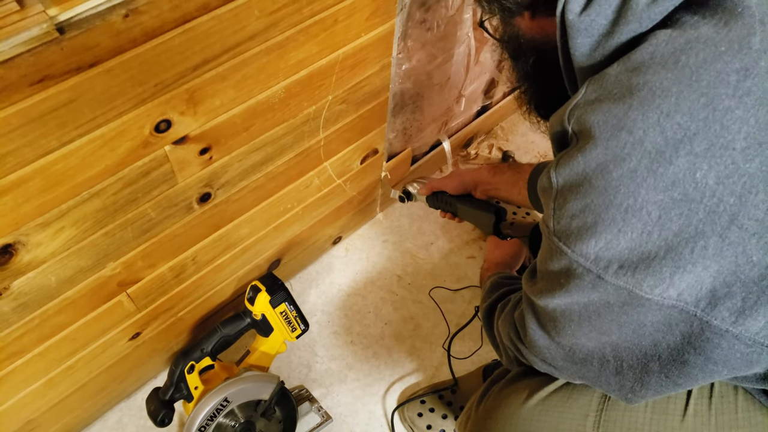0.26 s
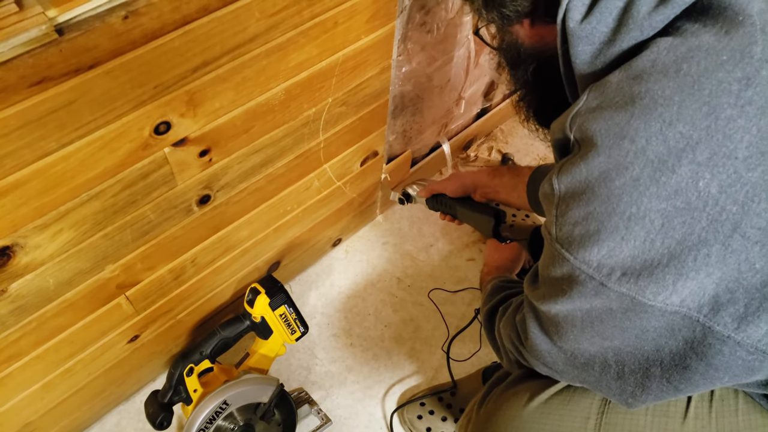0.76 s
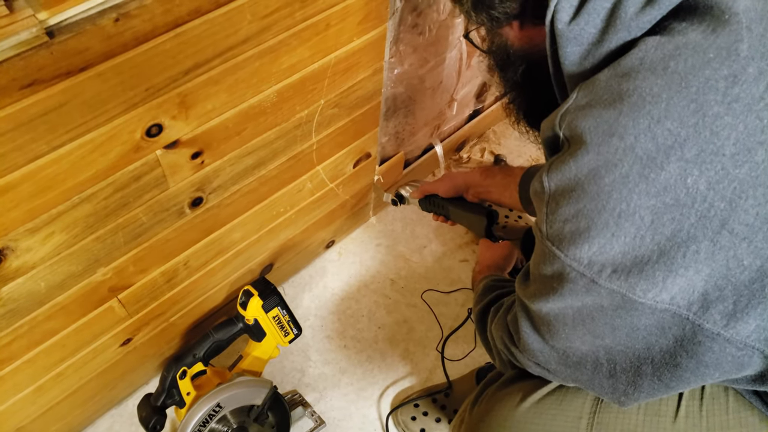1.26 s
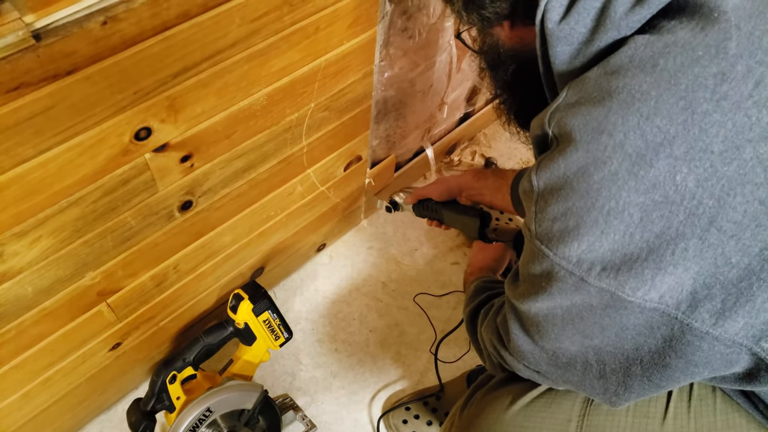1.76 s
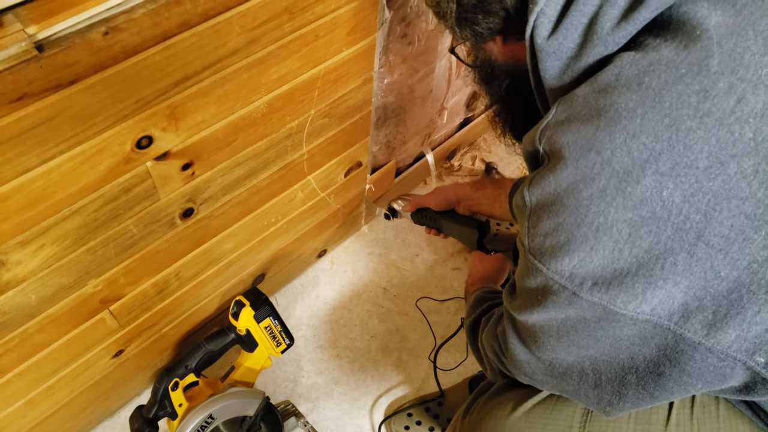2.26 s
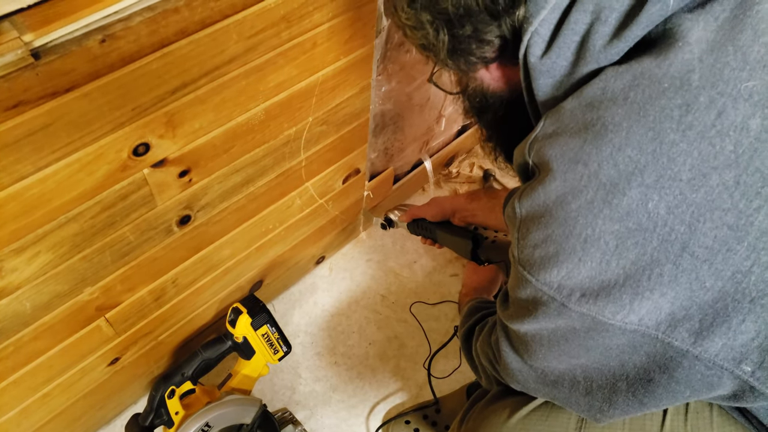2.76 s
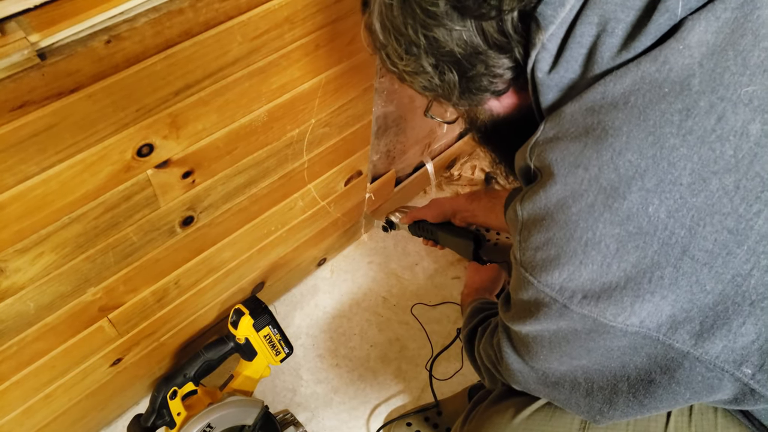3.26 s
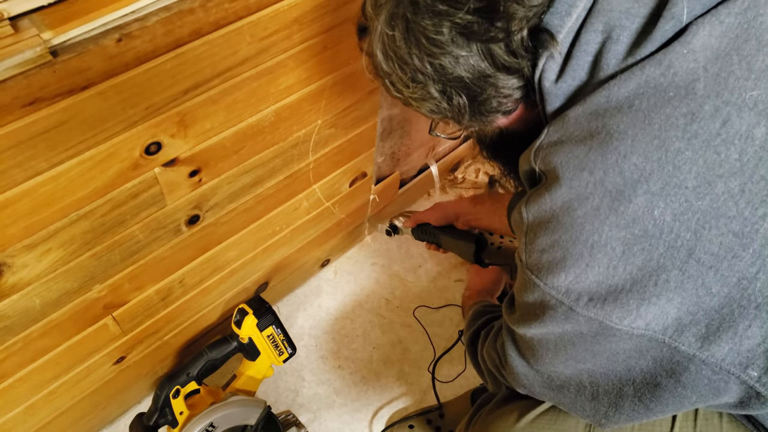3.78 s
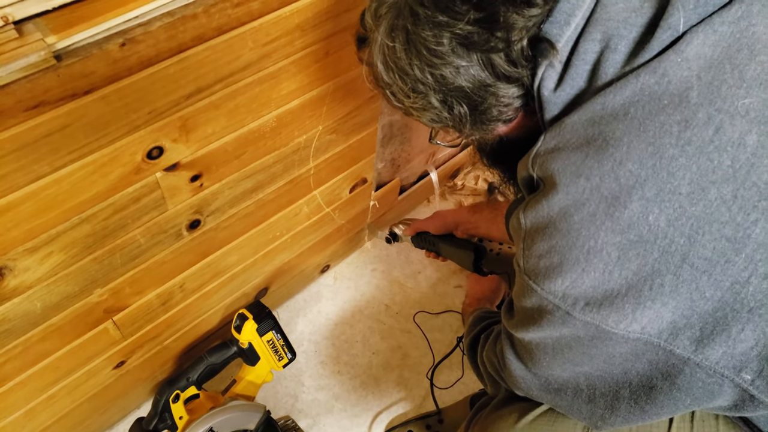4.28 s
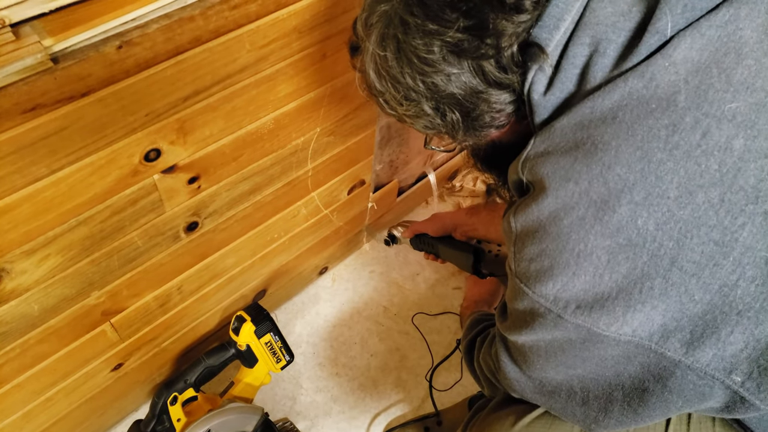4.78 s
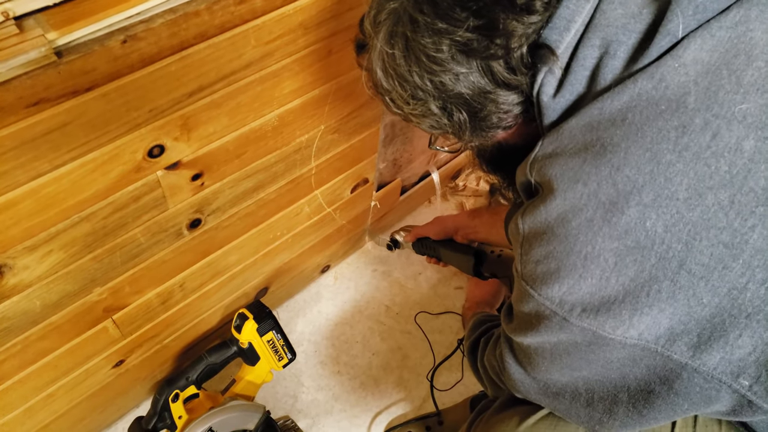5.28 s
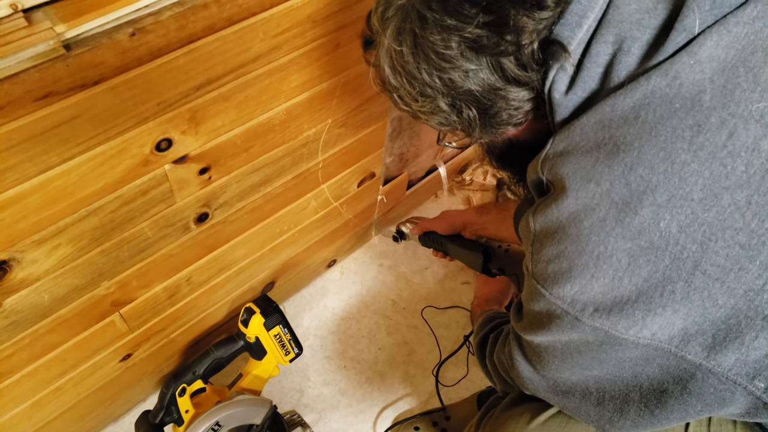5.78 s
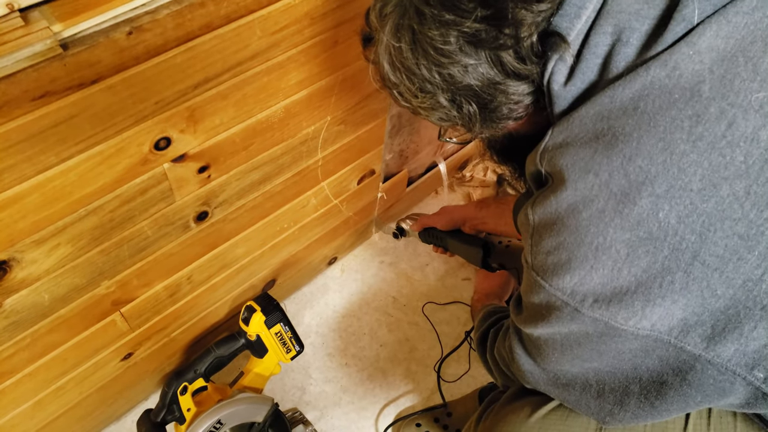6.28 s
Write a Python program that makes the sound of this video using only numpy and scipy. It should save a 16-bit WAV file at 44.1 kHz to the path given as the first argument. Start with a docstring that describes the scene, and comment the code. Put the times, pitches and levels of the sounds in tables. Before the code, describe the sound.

An oscillating multi-tool cuts a wooden wall, close on the left in a small room with a short echo. At the start its buzz is winding down, leaving a faint high whine. At 0.4 seconds it restarts with a soft knock and bites into the wood, rasping and sizzling over the hum of the shaking boards. From about 1.5 seconds it coasts down, stopping at 2 seconds, where the thin whine returns. A few small clicks come at 2.4 seconds as the motor starts again, then it cuts until the end, around 6.6 seconds. The pitch sags and the blade chatters near 3, 4 and 5.5 seconds, and most deeply at 6 seconds, recovering each time. The steel sizzles brightest between 4.3 and 5 seconds, and brief splintery crunches mark hard spots, most clearly near 0.6, 3.9 and 5.1 seconds.

```python
"""An oscillating multi-tool cuts into a wooden wall, close by on the left in a small room. Every stroke of the
blade rasps the wood and shakes the wall. Under load the motor sags and the blade chatters (catches unevenly);
it sizzles in its slot and crunches on hard spots. Twice the motor stands still and its speed controller whines;
the trigger clicks and the tool knocks as it starts again."""
import sys
import numpy as np
from scipy import signal
from scipy.fft import rfft, irfft, next_fast_len
from scipy.io import wavfile
from scipy.ndimage import uniform_filter1d, map_coordinates

SR = 44100
rng = np.random.default_rng(int(sys.argv[2]) if len(sys.argv) > 2 else 0)


def persist_wave(psi):
    """Save psi, clipped to +-1, as 16-bit WAV."""
    counts = np.round(np.clip(psi, -1, 1) * 32767).astype(np.int16)
    wavfile.write(sys.argv[1], SR, np.atleast_2d(counts).T)


N = 288414
TIME = np.arange(N) / SR

# tone colour of the steel blade: (frequency [Hz], relative level [dB])
BLADE_COLOUR = [(7500, -22), (9600, -2), (11200, -1.5), (12600, 6), (13600, 5), (14600, 5.5), (16000, 1)]
# the blade skips and shakes the wall: (middle [s], length [s], added chatter [0-1], relative level [dB])
SKIP_BOUTS = [(.49, .07, .1, -44), (.66, .06, .1, -41), (.86, .1, .28, -41), (1.11, .09, .3, -53),
              (1.32, .17, .55, -39), (1.91, .24, 0, -54), (2.485, .08, .1, -45), (2.76, .3, .35, -49),
              (3.14, .14, .12, -45), (3.69, .2, .35, -66), (3.93, .07, .45, -40), (4.05, .1, .12, -44),
              (5.19, .22, .28, -62), (5.37, .12, .35, -48), (6.01, .12, .05, -44), (6.5, .11, .55, -62)]


def amp(db):
    """Turns decibels into a gain."""
    return 10 ** (np.asarray(db) / 20)


def unit_level(x):
    """Scales a signal to an average (rms) level of 1."""
    return x / np.sqrt(np.mean(x ** 2) + 1e-20)


def over_time(rows):
    """Joins (time, value) points with straight lines, one value for each sample."""
    return np.interp(TIME, *np.transpose(rows))


def at_frequency(rows, hz):
    """Looks up hz between (frequency, value) points, on a logarithmic frequency scale."""
    frequencies, values = np.transpose(rows)
    return np.interp(np.log(hz + 1), np.log(frequencies + 1), values)


def filtered(x, gain):
    """Turns each frequency of a sound up or down by gain(hz)."""
    size = next_fast_len(N + 8192, True)
    return irfft(rfft(x, size) * gain(np.fft.rfftfreq(size, 1 / SR)), size)[..., :N]


def coloured(x, colour):
    """Gives a sound a tone colour, at an average level of 1."""
    return unit_level(filtered(x, lambda hz: amp(at_frequency(colour, hz))))


def wander(per_s):
    """A smooth random curve that changes about per_s times a second."""
    step = TIME * per_s * 8
    window = signal.get_window(("gaussian", 1.8), 15, False)
    slow = np.convolve(rng.standard_normal(int(step[-1]) + 20), window, "valid")
    return unit_level(np.interp(step, np.arange(len(slow)), slow))


def arch(middle_s, length_s):
    """Half a sine wave that swells to 1 and dies away."""
    out = np.zeros(N)
    part = slice(*np.searchsorted(TIME, [middle_s - length_s / 2, middle_s + length_s / 2]))
    out[part] = np.cos(np.pi * (TIME[part] - middle_s) / length_s)
    return out


def resonate(x, hz, width_hz):
    """Makes a sound ring around one frequency."""
    pole = np.exp((2j * np.pi * hz - np.pi * width_hz) / SR)
    return unit_level(signal.lfilter([1], [1, -pole], x).real)


def motor(free_hz=295, spin_up_s=.062, coast_s=.47):
    """The motor spins up fast and coasts down evenly; load is the share of speed that the wood takes."""
    # the trigger is held: (on [s], off [s])
    trigger = [(-1, -.24), (.418, 1.55), (2.432, 7)]
    # speed that the fully started motor holds against the wood: (time [s], stroke rate [Hz])
    held_speed = [(0.63, 281.1), (0.73, 275.6), (0.87, 254.0), (0.99, 272.9), (1.24, 273.3), (1.41, 263.5),
                  (1.52, 280.2), (2.66, 275.3), (2.78, 242.8), (2.99, 238.4), (3.07, 200.2), (3.18, 229.2),
                  (3.49, 270.7), (3.75, 294.4), (3.92, 268.7), (4.06, 238.4), (4.25, 282.5), (4.5, 288.2),
                  (4.68, 268.4), (4.83, 281.7), (5.04, 287.3), (5.31, 262.1), (5.49, 226.4), (5.59, 265.5),
                  (5.71, 278.8), (5.83, 259.3), (5.98, 170.2), (6.21, 276.7), (6.37, 288.9), (6.54, 278.7)]
    spin = np.zeros(N)  # 0 at rest, 1 fully started
    for on, off in trigger:
        rise = 1 - np.exp(-np.maximum(TIME - on, 0) / spin_up_s)
        spin += rise * np.clip(1 - (TIME - off) / coast_s, 0, 1)
    held_hz = over_time(held_speed)
    load = spin * np.maximum(1 - held_hz / free_hz, 0)
    return spin * held_hz, spin, load


def effort(spin, load, lag_s=.008, fade_below_spin=.05, sizzle_edge_s=.03):
    """Gathers what sets the loudness: spin, the fade to rest, the teeth's bite, load and sizzle."""
    # how deep the teeth bite: (time [s], relative level [dB])
    bite = [(0.01, -9.9), (0.56, -13.1), (0.64, -1.2), (0.92, -1.2), (0.98, -4.9), (1.06, -1.6),
            (1.4, -4.1), (1.62, -15.3), (2.5, -13.3), (2.68, -3.6), (3.15, 1.4), (3.62, -8.9), (4.05, 1.8),
            (4.3, -10.0), (4.48, -5.1), (5.03, -9.8), (5.37, -1.2), (5.64, -8.5), (6.03, -3.1),
            (6.47, -9.0)]
    # the blade rubs in its slot and sizzles: (start [s], end [s], relative boost [dB])
    sizzles = [(.62, .89, 6.5), (1.2, 1.46, 7), (2.7, 2.88, 5), (3.5, 3.57, 12.5), (3.91, 4.26, 6.5),
               (4.3, 4.85, 10.3), (4.88, 4.97, 10), (5.09, 5.14, 6), (5.76, 5.87, 5), (6.26, 6.35, 5),
               (6.37, 6.44, 6.5)]
    pole = np.exp(-1 / (lag_s * SR))
    lagged_spin = signal.lfilter([1 - pole], [1, -pole], spin - spin[0]) + spin[0]
    doublings = np.log2(lagged_spin + .01)
    rest_db = 20 * np.log10(np.clip(lagged_spin / fade_below_spin, .15, 1))
    half = sizzle_edge_s / 2
    sizzle_db = sum(np.interp(TIME, [start - half, start + half, end - half, end + half], [0, db, db, 0])
                    for start, end, db in sizzles)
    return doublings, rest_db, over_time(bite), load, sizzle_db


def loudness(law, work):
    """A layer's level in dB from the tool's effort. A law lists (base level [dB],
    per doubling of spin [dB], per dB of bite [dB], at full load [dB], per dB of sizzle [dB])."""
    base_db, per_doubling_db, per_bite, load_db, per_sizzle = law
    doublings, rest_db, bite_db, load, sizzle_db = work
    motor_db = base_db + per_doubling_db * doublings + rest_db + load_db * load
    return motor_db + per_bite * bite_db + per_sizzle * sizzle_db


def chattering(spin, load, work, easy_cut=.035, full_load=1.2, near_rest=.68, calm_per_db=.07):
    """The teeth catch unevenly when the motor is slow or labours, or they skip; the slot steadies them."""
    *_, sizzle_db = work
    unguided = np.clip(1 - calm_per_db * sizzle_db, 0, 1)
    bouts = sum(added * arch(s, length) for s, length, added, _ in SKIP_BOUTS)
    return (easy_cut + full_load * load) * unguided + near_rest * (1 - spin ** 3) + bouts


def stroke_pattern(strokes, overtones=94, size=2048, changes_per_s=20):
    """The teeth scrape nearly the same pattern on every stroke; its overtones drift and flare at random."""
    step = TIME * changes_per_s
    drift, height = rng.standard_normal((2, int(step[-1]) + 2, overtones))
    phase = rng.uniform(0, 2 * np.pi, overtones) + .7 * np.cumsum(drift, 0)
    level_db = 3.2 * unit_level(uniform_filter1d(height, size=3, axis=0))
    spectra = np.pad(amp(level_db) * np.exp(1j * phase), ((0, 0), (1, 0)))
    shapes = irfft(spectra, size)  # each row is the wave of one stroke
    return unit_level(map_coordinates(shapes, [step, strokes % 1 * size], order=1, mode="grid-wrap"))


def scrape(pattern, strokes, chatter, looseness, pulse, groove, grain_db):
    """Repeating scrape and random splintering, both strongest once in each stroke."""
    steady = (1 - chatter) ** looseness
    splinters = rng.standard_normal(N) * amp(grain_db * wander(450))
    # in a clean groove each stroke partly repeats the splintering of the one before
    stroke_before = np.rint(np.interp(strokes - 1, strokes, np.arange(N))).astype(int)
    memory = np.clip(groove * (1 - chatter), 0, 1)
    splinters = unit_level((splinters + memory * splinters[stroke_before]) / np.hypot(1, memory))
    contact = unit_level(np.exp(pulse * np.cos(2 * np.pi * strokes)))
    return contact * (np.sqrt(steady) * pattern + np.sqrt(1 - steady) * splinters)


def cutting(strokes, chatter, work, slip=.015, skip=.71):
    """Boards buzz, teeth rasp and steel sizzles; a chattering blade slips in time and hits strong-weak."""
    # tone colours of the boards, the teeth and the rattle: (frequency [Hz], relative level [dB])
    board_colour = [(60, -55), (600, -32.5), (860, 3), (960, 3), (1150, 2.5), (1350, 4), (1650, 2.5),
                    (1900, 6.5), (2250, -9.5), (2800, -50.5)]
    teeth_colour = [(1600, -37), (2200, 3), (2550, 3.5), (3200, 1.5), (3900, 2), (4600, 2), (5300, 5.5),
                    (5800, 9), (6400, 4), (7400, 3), (8500, -1), (9500, -11.5), (11500, -21.5)]
    rattle_colour = [(40, -50), (150, -27.5), (300, 3.5), (380, 0), (480, 7.5), (640, 5), (830, 3),
                     (1000, -25), (1400, -25)]
    # how each layer follows the tool's effort: (columns as in loudness)
    buzz_law = (-35.6, 7.4, .8, -4.5, .06)
    rasp_law = (-29, 7.7, .97, -12, .56)
    sizzle_law = (-23.7, 7.3, .94, -14.5, 1.02)
    pattern = stroke_pattern(strokes + slip * chatter ** 1.4 * wander(70))
    skipping = pattern * np.cos(np.pi * strokes + wander(15))  # flips sign from stroke to stroke
    pattern = pattern + skip * chatter * skipping
    wood = scrape(pattern, strokes, chatter, looseness=.16, pulse=.14, groove=1, grain_db=2.5)
    teeth = scrape(pattern, strokes, chatter, looseness=2.32, pulse=.18, groove=.58, grain_db=2)
    steel = scrape(pattern, strokes, chatter, looseness=7.1, pulse=.22, groove=.25, grain_db=2)
    buzz_db = loudness(buzz_law, work)
    buzz = amp(buzz_db - .9) * coloured(wood, board_colour)
    rasp = amp(loudness(rasp_law, work)) * coloured(teeth, teeth_colour)
    sizzle = amp(loudness(sizzle_law, work)) * coloured(steel, BLADE_COLOUR)
    # skipped strokes rattle the boards between the overtones
    rattle = coloured(skipping + 1.3 * rng.standard_normal(N), rattle_colour)
    rattle *= amp(buzz_db - 2) * chatter ** 1.72
    return buzz + rasp + sizzle + rattle + brief_rings(wood)


def brief_rings(wood):
    """Wall, boards or tool ring briefly at one pitch, from low booms to a high metallic ring."""
    # each ring: (middle [s], length [s], pitch [Hz], half width of each filter [Hz], level [dB])
    rings = [(.01, .12, 160, 50, -38), (.12, .15, 180, 50, -36), (.72, 0.18, 1585, 89.5, -33.5),
             (.72, .24, 2250, 300, -36), (0.92, 0.14, 1840, 90.3, -42), (1.02, .18, 5550, 200, -37),
             (1.25, .5, 2330, 300, -39), (1.38, .12, 530, 60, -39), (2.73, 0.17, 1740, 226, -37.5),
             (2.933, 0.36, 1900, 151, -43), (3.14, .1, 220, 40, -29), (3.25, 0.2, 965, 70, -41),
             (4.03, .18, 243, 40, -27), (4.04, .16, 3200, 200, -38), (4.68, .08, 1900, 300, -38),
             (4.68, .12, 268, 40, -36), (5.22, .3, 275, 40, -34), (5.42, 0.24, 480, 61, -29),
             (5.39, 0.28, 1290, 158, -34.5), (5.38, .34, 1850, 400, -39), (6.25, .45, 3700, 500, -38)]
    out = np.zeros(N)
    for s, length, hz, half_width, db in rings:
        swell = arch(s, length)
        ring = swell * resonate(resonate(wood, hz, 2 * half_width), hz, 2 * half_width)
        out += amp(db) * unit_level(ring) * np.sqrt(np.mean(swell ** 2))
    return out


def shaking_wall(strokes, chatter, stroke_hz, work, wobble=.23, flutter_db=4, drift_db=2, chatter_db=22):
    """The wall hums at 1, 2 and 3 times the stroke rate, and shudders at half of it as the blade skips."""
    # how strongly the wall answers a shake: (frequency [Hz], gain [dB])
    wall_response = [(150, -5), (175, -5), (205, -1), (238, 1), (278, -11.5), (470, -17), (520, -7.5),
                     (560, -14), (720, -12), (860, -12)]
    # tone colour of the shudder's rumble: (frequency [Hz], relative level [dB])
    rumble_colour = [(20, -53), (60, -32.5), (100, -23), (130, -4), (170, -3.5), (230, -12), (340, -18.5),
                     (700, -56.5)]
    # how hum and shudder follow the tool's effort: (columns as in loudness)
    hum_law = (-30, 9.6, 1.0, 0, .02)
    shudder_law = (-70, 4, .3, 0, .02)
    angle = 2 * np.pi * strokes + wobble * chatter * wander(36)
    hums = []
    for k in (1, 2, 3):
        hum_db = loudness(hum_law, work) + at_frequency(wall_response, k * stroke_hz)
        waver_db = drift_db * wander(10) + flutter_db * chatter * wander(50)
        hums.append(np.sqrt(2) * amp(hum_db + waver_db) * np.sin(k * angle + k * k))
    half_rate_tone = unit_level(np.sin(np.pi * strokes + wander(11)))
    rumble = coloured(rng.standard_normal(N), rumble_colour)
    # from 225 to 270 strokes a second the blade starts to skip every other stroke
    tone_share = .79 * chatter * np.interp(stroke_hz, [225, 270], [0, 1])
    shudder = np.sqrt(tone_share) * half_rate_tone + np.sqrt(1 - tone_share) * rumble
    level = amp(loudness(shudder_law, work) + chatter_db * chatter)
    level += sum(amp(db - 1.5) * arch(s, length) ** 2 for s, length, _, db in SKIP_BOUTS)
    return hums[0] + level * shudder, sum(hums[1:])


def room_echo(x, size=12000, gap_s=.002):
    """The room gives each side a short wash of echoes, the treble dying first."""
    # how long the room rings: (frequency [Hz], time to fall by 60 dB [s])
    decay_times = [(150, 0.27), (1000, 0.27), (5000, 0.099), (15000, .11)]
    echoes = rng.standard_normal((2, size)) * (np.arange(size) / SR > gap_s)
    hz, t, bands = signal.stft(echoes, SR, nperseg=256)
    decay_s = at_frequency(decay_times, hz)[:, None]
    bands = bands * amp(-60 * t / decay_s) / np.sqrt(decay_s)
    tail = signal.istft(bands, SR, nperseg=256)[1]
    return signal.fftconvolve(x[None], tail / np.linalg.norm(tail[0]), axes=1)[:, :N]


def room_tone(air_db=-75):
    """Quiet air and the hum of the electric mains fill the room."""
    # tone colour of the air: (frequency [Hz], relative level [dB])
    air_colour = [(20, -35), (55, 31.5), (150, 9), (300, 1), (700, -23), (2000, -42), (6000, -45),
                  (16000, -45)]
    # tones of the mains hum: (frequency [Hz], level [dB])
    mains = [(59.5, -114), (179, -92), (360, -87)]
    air = coloured(rng.standard_normal(N) + .6 * rng.standard_normal((2, N)), air_colour)
    hum = np.sqrt(2) * sum(amp(db) * np.sin(2 * np.pi * hz * TIME) for hz, db in mains)
    return amp(air_db) * air + hum


def controller_whine(pitch_hz=2403.5, sharp=.0092, settle_s=.024, fade_s=.015):
    """Switched current sings in the standing motor, a little high in pitch at first."""
    # the motor stands still: (start [s], end [s])
    standstills = [(.235, .43), (2.02, 2.49)]
    # tones of the whine: (multiple of the pitch, level [dB])
    tones = [(1, -69), (2, -64), (3, -79), (4, -90), (5, -77), (6, -81)]
    out = np.zeros(N)
    for start, end in standstills:
        t = np.maximum(TIME - start, 0)
        cycles = np.cumsum(pitch_hz * (1 + sharp * np.exp(-t / settle_s))) / SR
        fade = np.clip(np.minimum(t, end - TIME) / fade_s, 0, 1)
        out += fade * np.sqrt(2) * sum(amp(db) * np.sin(2 * np.pi * k * cycles) for k, db in tones)
    return out


def clicks_and_knocks(thud_hz=175, thud_s=.013, tick_s=.005):
    """Ticks and short thuds as the trigger is worked and the motor starts."""
    # clicks and knocks around the restarts: (time [s], thud level [dB], tick level [dB])
    knocks = [(0.423, -35, -65), (2.364, -59.5, -63), (2.4, -50, -46), (2.428, -62, -58), (2.442, -57, -45)]
    out = np.zeros(N)
    hiss = coloured(rng.standard_normal(N), BLADE_COLOUR)
    for s, thud_db, tick_db in knocks:
        t = np.maximum(TIME - s, 0)
        out += amp(thud_db) * np.sin(2 * np.pi * thud_hz * t) * np.exp(-t / thud_s)
        out += amp(tick_db) * hiss * (t > 0) * np.exp(-t / tick_s)
    return out


def snagging(rise_s=.01, fall_s=.021):
    """A snag upsets the blade for a moment and tears out splinters with a crunch."""
    # the teeth hit a hard spot: (time [s], added chatter [0-1], crunch level [dB])
    snags = [(.635, 0.1, -33), (1.235, 0.3, -46), (3.911, 0, -31), (4.543, 0.48, -40), (4.676, 0.3, -40),
             (5.09, 0.13, -34.5), (5.525, .4, -39.5)]
    # tone colour of the crunch: (frequency [Hz], relative level [dB])
    crunch_colour = [(30, -45), (100, -21.5), (300, -7.5), (1000, -8.5), (3000, -4.5), (6000, 2),
                     (10000, -12), (16000, -11)]
    upset, level = np.zeros((2, N))
    for s, added, db in snags:
        t = np.maximum(TIME - s, 0)
        burst = (1 - np.exp(-t / rise_s)) * np.exp(-t / fall_s)
        burst /= burst.max()
        upset += added * burst
        level += amp(db) * burst
    splinters = rng.standard_normal(N) * amp(3.3 * wander(500))
    return upset, level * coloured(splinters, crunch_colour)


def scene(left_echo_db=-6, right_echo_db=2, bass_lean_db=1.5):
    """The left side faces the tool; the right hears mostly the room; the bass reaches both almost alike."""
    # direct sound that bends round to the far side: (frequency [Hz], gain [dB])
    shadow = [(200, -1.5), (1000, -6.5), (4000, -17.5), (15000, -28.5)]
    # further lean to the left: (frequency [Hz], left minus right [dB])
    lean = [(60, 0), (150, 4.6), (280, 10), (500, 5.5), (800, 13), (1290, 11.5), (2380, 11.5), (4400, 15.5),
            (8120, 20.5), (15000, 20.5)]
    stroke_hz, spin, load = motor()
    unsteady_hz = np.maximum(stroke_hz, 1) * (1 + .001181 * wander(26.2))
    strokes = np.cumsum(unsteady_hz) / SR  # running count of blade strokes
    upset, crunch = snagging()
    work = effort(spin, load)
    chatter = np.clip(chattering(spin, load, work) + upset, .015, .98)
    bass, drone = shaking_wall(strokes, chatter, stroke_hz, work)
    cut = cutting(strokes, chatter, work) + crunch + clicks_and_knocks()
    left_echo, right_echo = room_echo(cut)
    left = cut + amp(left_echo_db) * left_echo
    right = filtered(cut, lambda hz: amp(at_frequency(shadow, hz))) + amp(right_echo_db) * right_echo
    pair = np.array([left, right]) + drone + controller_whine()
    pair = filtered(pair, lambda hz: 2 / (1 + amp(np.outer([-1, 1], at_frequency(lean, hz)))))
    return pair + bass * amp([[bass_lean_db], [-bass_lean_db]]) + room_tone()


def record(dry, cutoff_hz=15850):
    """Cuts away the very highest treble."""
    low_pass = signal.firwin(511, cutoff_hz, window=("kaiser", 9), fs=SR)
    return signal.oaconvolve(dry, low_pass[None], "same")


dry = scene()
out = record(dry)
persist_wave(out)
```